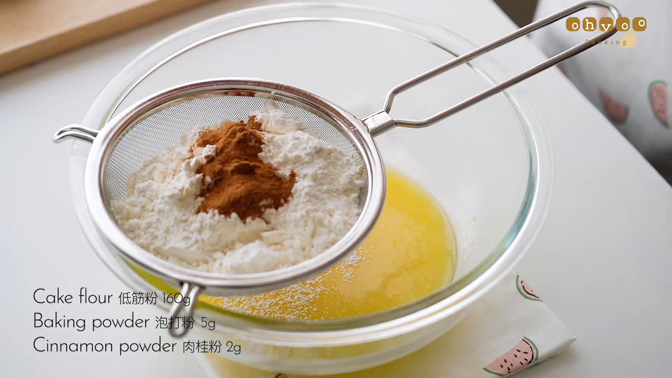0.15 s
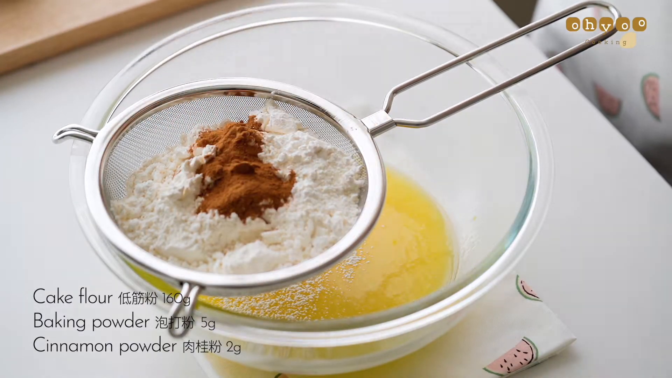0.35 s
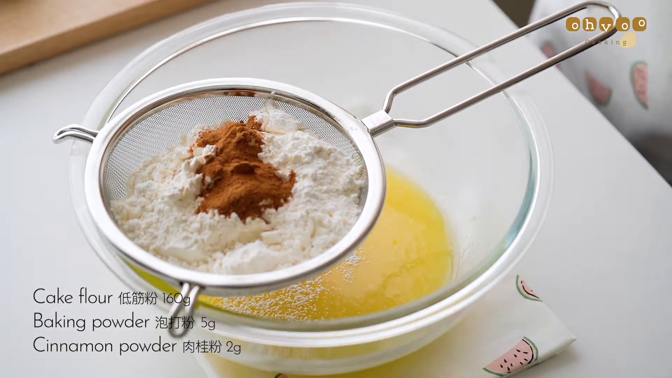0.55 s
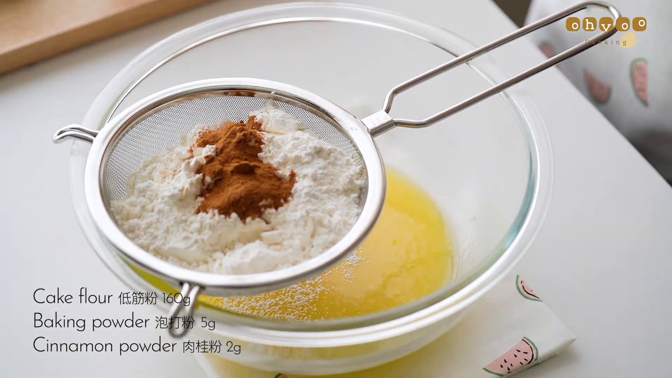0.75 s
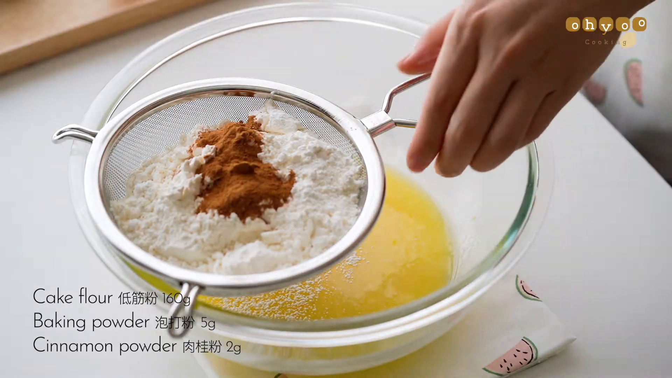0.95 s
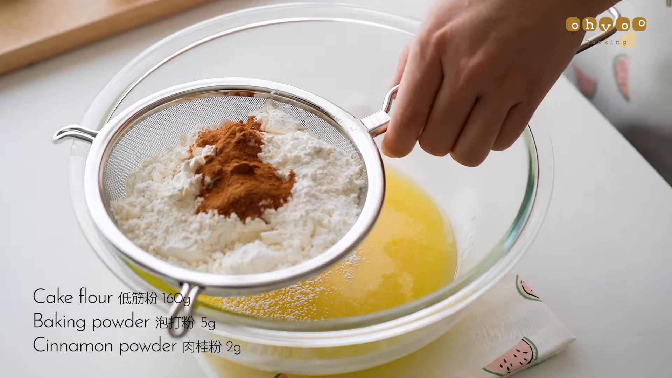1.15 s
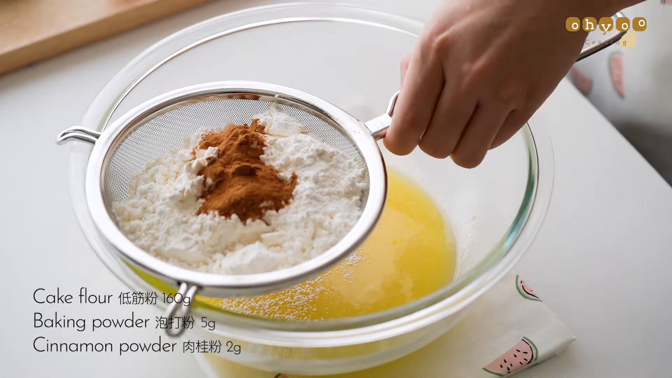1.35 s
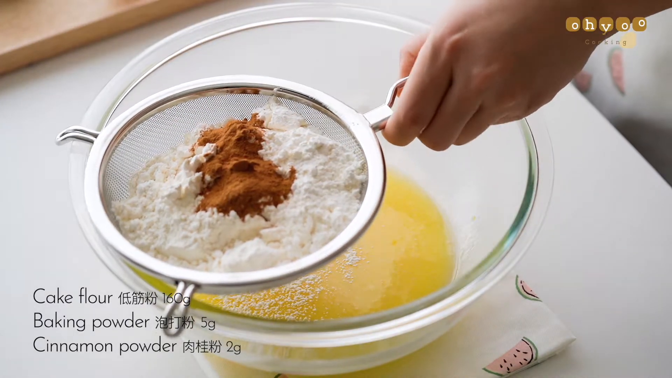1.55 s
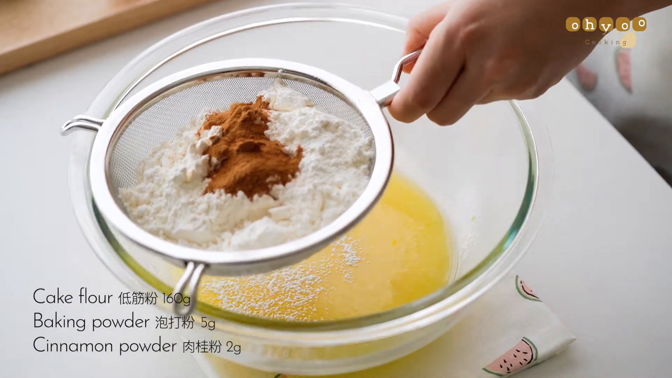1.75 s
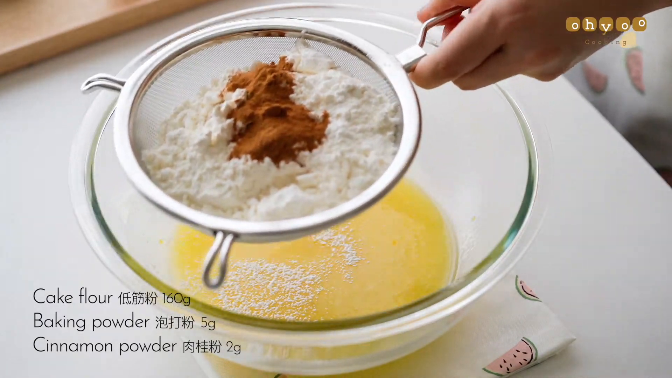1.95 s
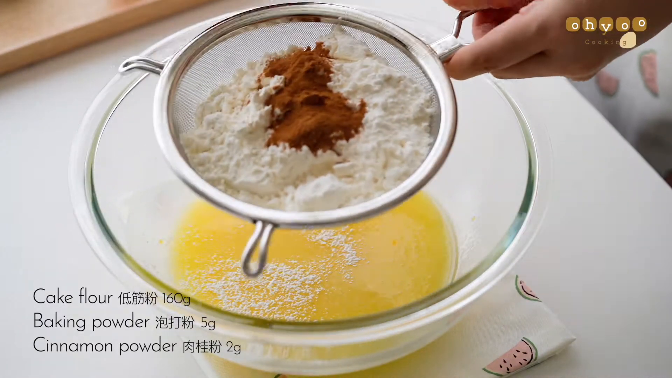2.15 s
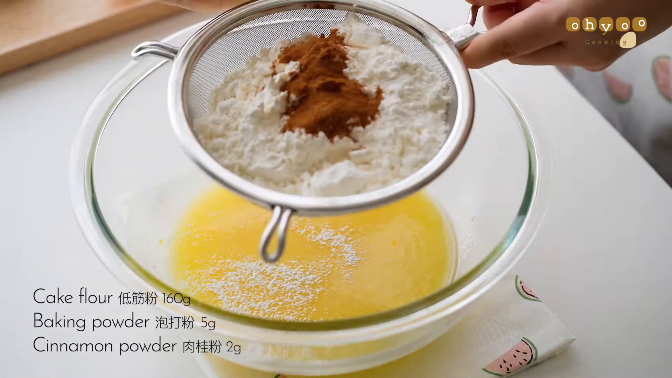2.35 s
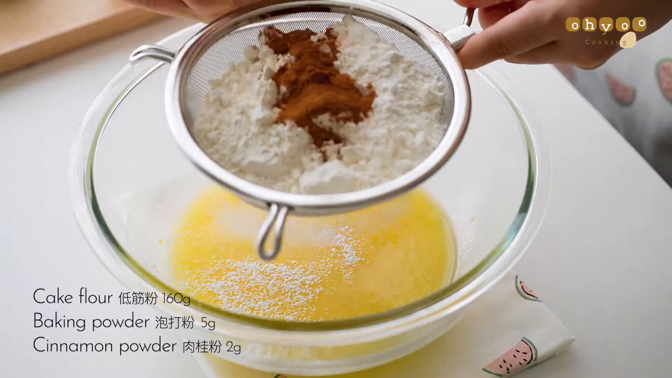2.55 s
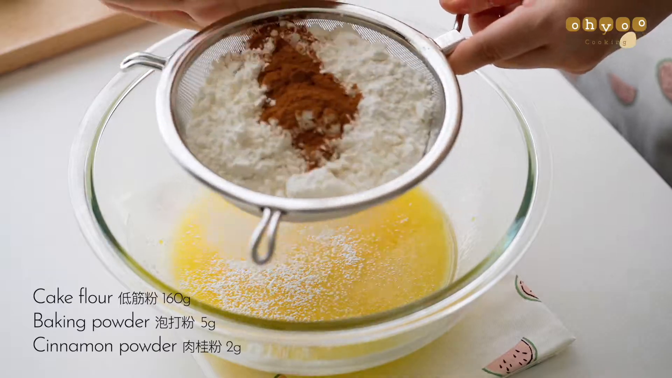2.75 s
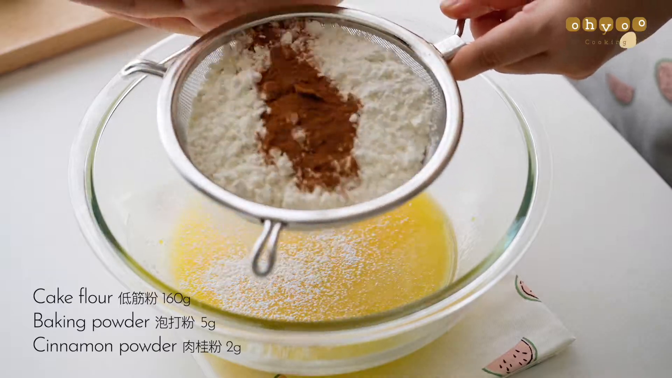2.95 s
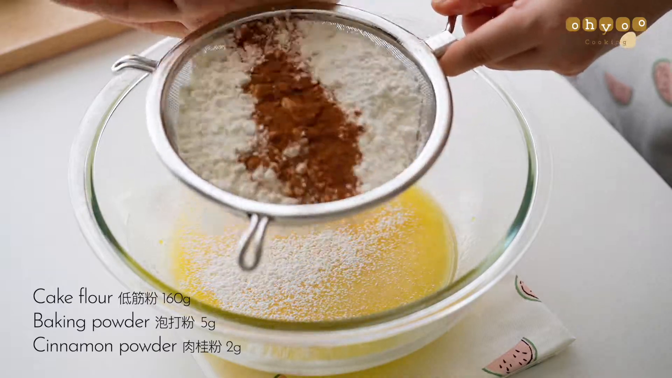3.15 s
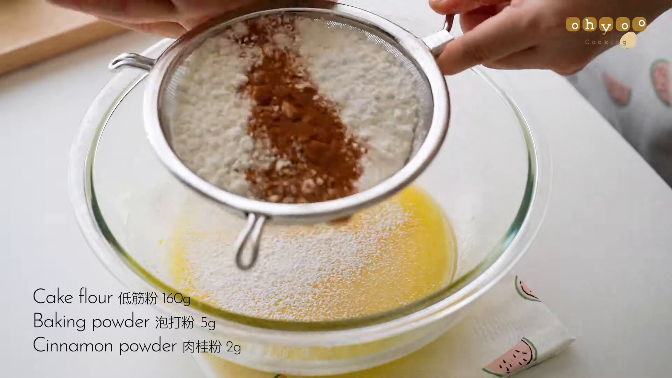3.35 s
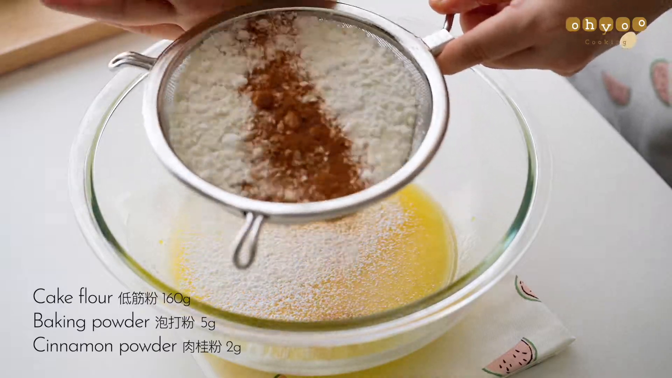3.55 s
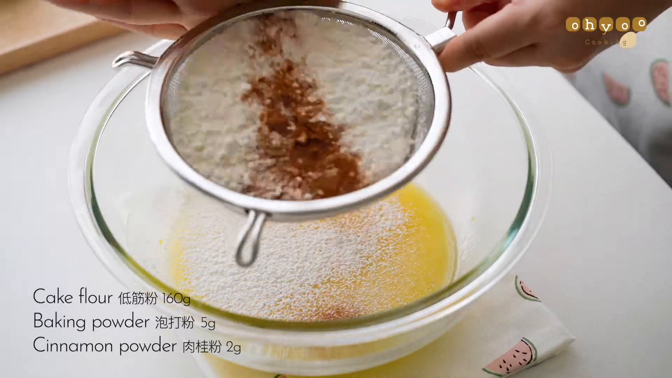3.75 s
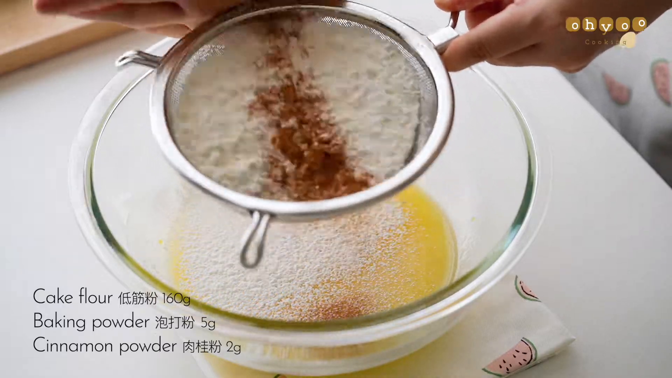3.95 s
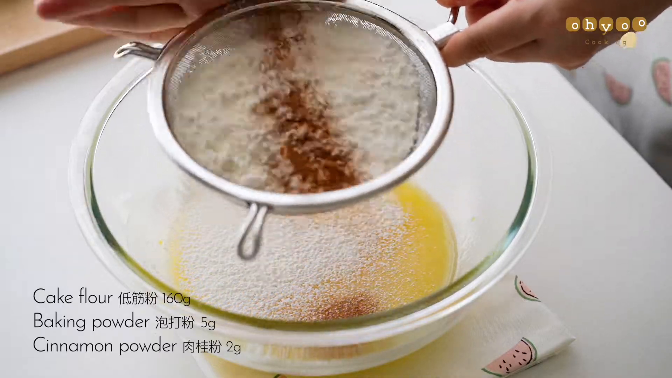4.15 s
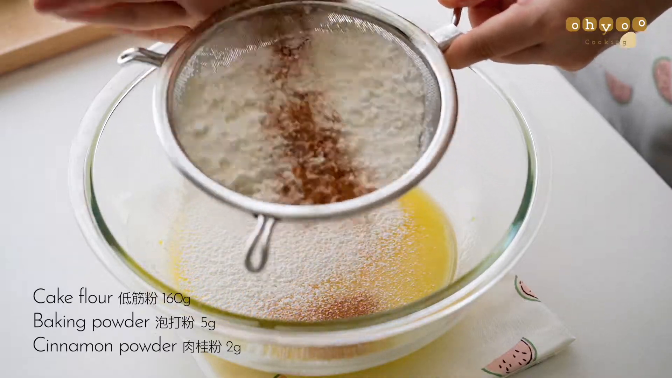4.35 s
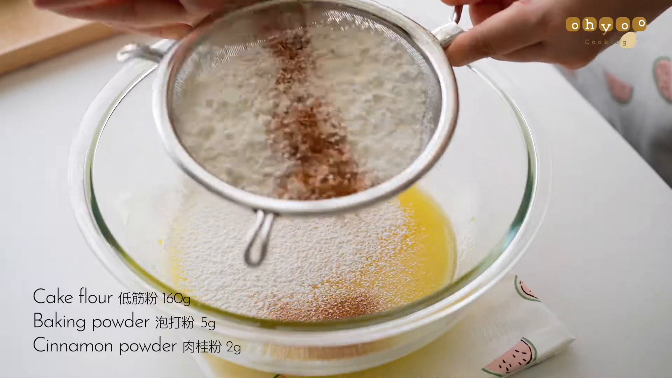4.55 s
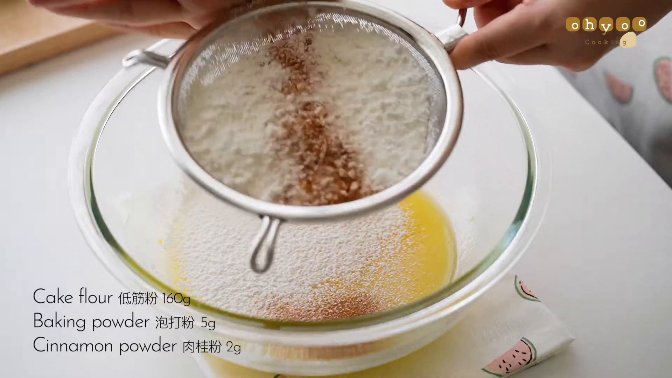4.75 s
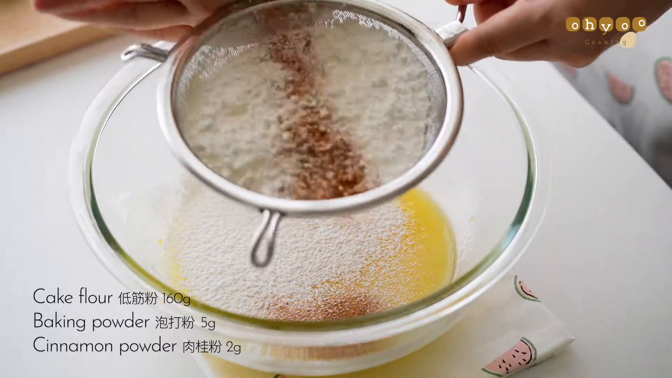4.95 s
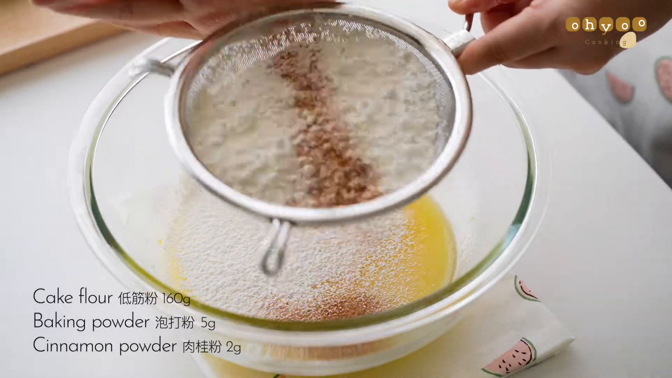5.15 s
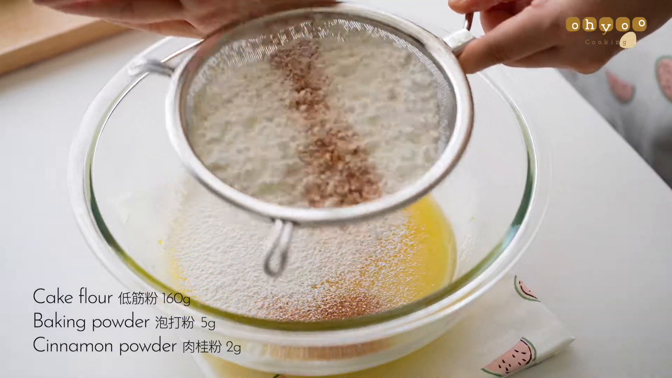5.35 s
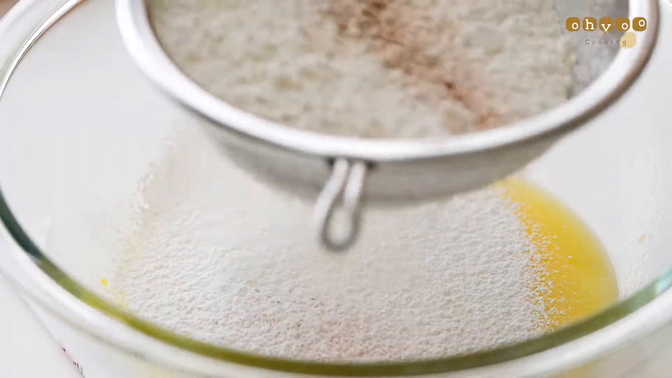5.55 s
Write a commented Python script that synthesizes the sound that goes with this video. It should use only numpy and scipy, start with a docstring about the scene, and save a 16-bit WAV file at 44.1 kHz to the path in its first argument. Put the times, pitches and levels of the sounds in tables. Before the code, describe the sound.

A metal flour sieve is picked up with a small clink off a glass bowl, then patted by hand about five times a second, flour hissing through.

```python
"""A low room rumble and finger rustle; a clinking sieve leaves a glass bowl, then pats come about five a second.
Each pat is a slap of skin on the metal rim (noise burst, damped modes), a deep bounce of the loaded mesh (pushed
swing) and a short rush of flour through the wires (filtered grit). Brushes are gritty puffs; clinks ring steel
modes. Rumble, drone and air hiss are shaped noise; bumps make the table hum at 50 Hz."""
import sys
import numpy as np
from scipy import signal
from scipy.fft import rfft, irfft, next_fast_len
from scipy.io import wavfile
from scipy.ndimage import uniform_filter1d

SR = 44100
rng = np.random.default_rng(int(sys.argv[2]) if len(sys.argv) > 2 else 0)


def voltage_ratio(decibels):
    """Convert decibels (scalar or array-like) to amplitude ratios, 20 dB per decade."""
    exponent = np.asarray(decibels, float) / 20
    return 10 ** exponent


def unload_wav(signal):
    """Save mono or channel-first audio to the path in sys.argv[1] as 16-bit WAV at rate SR, clipped to [-1, 1]."""
    wavfile.write(
        sys.argv[1],
        SR,
        np.round(np.clip(np.atleast_2d(signal).T, -1, 1) * 32767).astype(np.int16),
    )


N = 246959
T = np.arange(N) / SR
CUT_S = 5.3962  # sounds placed by add() before this stop dead here

# steel frame ring modes [f/Hz, level/dB, t60/s]
FRAME_MODES = [(690, -8, .1), (1346, -4, .2), (1403, -11, .12), (2485, -3, .15), (2515, -10, .25),
               (2600, -11, .12), (2902, -14, .15), (3905, -11, .14), (3945, 0, .075), (4387, -10, .03),
               (5532, -5, .11), (9170, -14, .08)]


def level(x, db):
    """Scale to an rms level."""
    return x * voltage_ratio(db) / np.sqrt(np.mean(x ** 2))


def unit_energy(x):
    """Scale an impulse response to unit energy: white noise keeps its rms."""
    return x / np.sqrt(np.sum(x ** 2))


def band(x, hz, width_hz):
    """Two-pole resonance, gain 1 at the centre."""
    return signal.lfilter(*signal.iirpeak(hz, hz / width_hz, fs=SR), x)


def colour(x, peaks):
    """Sound through a set of steep resonances; white noise of rms 1 comes out at rms 1."""
    probe = np.zeros(4096)
    probe[0] = 1
    shape = sum(voltage_ratio(db) * band(band(probe, hz, w), hz, 2 * w) for hz, w, db in peaks)
    return signal.fftconvolve(x, unit_energy(shape))[:len(x)]


def ring(modes, t):
    """Free decay of a set of modes."""
    out = 0
    for hz, db, t60_s in modes:
        decay = np.exp(-np.log(1000) * t / t60_s)
        out = out + voltage_ratio(db) * decay * np.sin(2 * np.pi * hz * t)
    return out


def walk(rate_hz):
    """Random levels held 1 / rate_hz and slewed twice; spread near 1."""
    k = int(SR / rate_hz)
    held = np.repeat(rng.standard_normal(N // k + 1), k)
    return 1.33 * uniform_filter1d(uniform_filter1d(held, k), k)[:N]


def grit(spread_db):
    """Noise of grains whose sizes differ widely; rms 1."""
    return level(rng.standard_normal(N) * voltage_ratio(spread_db * rng.exponential(size=N)), 0)


def add(out, s, x):
    """Mix x in from time s; a sound begun before the cut ends there."""
    i = int(s * SR)
    end = int(CUT_S * SR) if s < CUT_S - .006 else N
    x = x[:end - i]
    out[i:i + len(x)] += x


def curves(table):
    """Columns of a table, sample by sample."""
    s, *columns = np.transpose(table)
    return [np.interp(T, s, c) for c in columns]


def resonant_noise(hz, width_hz):
    """White noise through a steep resonance; rms 1."""
    noise = rng.standard_normal(N)
    return level(band(band(noise, hz, width_hz), hz, 3 * width_hz), 0)


def room():
    """Low resonances of the kitchen flutter, together and each alone, over a deeper drone."""
    # low room sound [t/s, rumble level/dB, drone level/dB]
    lows = [(0.0, -56, -59), (0.3, -57, -60), (0.45, -54, -60), (0.58, -53, -59.5), (0.63, -58.5, -59),
            (0.75, -53.5, -60.5), (1.03, -60, -61), (1.4, -55, -57), (1.89, -58, -61.5),
            (2.21, -60.5, -56.5), (2.68, -59, -61), (3.05, -58.5, -56), (3.57, -55.5, -64),
            (3.9, -59, -56.5), (4.9, -56.5, -64.5), (5.6, -58, -55.5)]
    # rumble resonances [f/Hz, width/Hz, level/dB]
    rumble_peaks = [(140, 40, -4), (172, 24, -1), (224, 24, 0), (260, 22, -5), (325, 45, -7),
                    (420, 100, -15), (600, 300, -23)]
    # drone resonances [f/Hz, width/Hz, level/dB]
    drone_peaks = [(32.3, 5.7, -11.5), (50.6, 45, -1), (79.1, 14.2, 0)]
    rumble_db, drone_db = curves(lows)
    flutter = walk(7.1)
    rumble, drone = np.zeros(N), np.zeros(N)
    for hz, w, db in rumble_peaks:
        rumble += voltage_ratio(db + 1.84 * flutter + 2.53 * walk(12)) * resonant_noise(hz, w)
    for hz, w, db in drone_peaks:
        drone += voltage_ratio(db + 1.1 * walk(7.9)) * resonant_noise(hz, w)
    return voltage_ratio(rumble_db) * level(rumble, 0) + voltage_ratio(drone_db) * level(drone, 0)


def air():
    """Thin steady hiss: white noise shaped in frequency."""
    # hiss spectrum before scaling [f/Hz, level/dB]
    spectrum = [(240, -3), (400, 3.5), (496, -8), (579, 3.5), (906, -17), (2120, -13.5), (4650, -24),
                (8750, -36), (11000, -46), (15000, -44), (16000, -46)]
    hz, db = np.transpose(spectrum)
    size = next_fast_len(N)
    bin_hz = np.arange(size // 2 + 1) * SR / size
    gain = voltage_ratio(np.interp(np.log(bin_hz + 1), np.log(hz), db))
    return level(irfft(rfft(rng.standard_normal(size)) * gain, size)[:N], -74)


def hands():
    """Fingers and stray flour rustle in uneven patches; the rubbing keeps the frame faintly singing."""
    # hands moving [t/s, rustle level/dB]
    rustle_levels = [(0.0, -78), (0.8, -77), (0.97, -73.5), (1.26, -76), (1.46, -68.5), (1.56, -67),
                     (1.73, -75.5), (2.14, -72.5), (2.3, -77), (2.9, -73.5), (3.81, -74), (4.5, -75),
                     (5.21, -73), (5.6, -69.5)]
    # rustle colour [f/Hz, width/Hz, level/dB]
    rustle_peaks = [(1415, 1760, 4.5), (2500, 170, -11), (3900, 530, -41), (5470, 910, -10)]
    # fine treble colour [f/Hz, width/Hz, level/dB]
    fine_peaks = [(6800, 4500, -2.5), (8270, 2250, -3.5)]
    # fingers close on the bare handle while the frame still rests on the glass
    grip_start_s, grip_end_s = 1.12, 1.68
    free_sing_db, held_sing_db = -12, -19  # under the rustle, in that span and outside it
    rustle_db, = curves(rustle_levels)
    # treble levels at a -76 dB rustle, and how far they follow it
    fine_db = -80 + 0.42 * (rustle_db + 76)
    top_db = -86.5 + 0.33 * (rustle_db + 76)
    rub = grit(1.94) * voltage_ratio(rustle_db + 1.35 * walk(40))
    gripping = (T > grip_start_s) & (T < grip_end_s)
    sing_db = np.where(gripping, free_sing_db, held_sing_db) + 4 * walk(25)
    frame = ring(FRAME_MODES, T[:SR // 4])
    sing = signal.fftconvolve(rub * voltage_ratio(sing_db), unit_energy(frame))[:N]
    fine = colour(grit(1.0) * voltage_ratio(fine_db + 1.3 * walk(40)), fine_peaks)
    top = colour(grit(0.55) * voltage_ratio(top_db), [(14000, 2800, 0)])
    return colour(rub, rustle_peaks) + sing + fine + top


def swishes():
    """Short brushes of skin, cloth and wire, each a gritty puff in its own band."""
    # brushes, low against the table, high on handle and cloth [t/s, level/dB, f/Hz, spread/ms]
    brushes = [(.058, -75, 9300, 20), (.055, -80, 12800, 16), (.06, -73, 1150, 12), (.205, -76, 9400, 6),
               (.247, -66.5, 1200, 6), (0.466, -46, 224, 16.7), (.48, -77, 3960, 19.6),
               (.536, -50, 244, 33), (0.581, -51, 232, 7.3), (.83, -76.5, 9300, 15), (0.945, -53, 275, 18),
               (1.0, -68, 2200, 16), (1.0, -77, 7800, 19), (1.19, -76, 5900, 14), (1.185, -77, 13500, 17),
               (1.01, -80, 14000, 25), (1.236, -65.5, 9100, 4.7), (1.4, -72.5, 14000, 53),
               (1.55, -78, 14000, 50), (1.62, -73, 8800, 20), (1.72, -75, 7000, 32), (1.825, -75, 6800, 10),
               (1.99, -74, 7500, 15), (2.15, -76, 14000, 18), (2.17, -77, 6800, 40)]
    out, t, noise = np.zeros(N), T[:SR // 5], grit(2.9)
    for s, swish_db, hz, spread_ms in brushes:
        start = int(s * SR)
        puff = np.exp(-((t - .1) / (spread_ms / 1000)) ** 2) * noise[start:start + len(t)]
        swish = voltage_ratio(swish_db) * colour(puff, [(hz, 0.19 * hz, 0)])
        before_start = max(int((.1 - s) * SR), 0)
        add(out, max(s - .1, 0), swish[before_start:])
    return out


def knocks():
    """Skin lands on the rim: a bright slap and a dull knock, each spot stirring the modes differently."""
    # skin and rim in contact [t/s, slap level/dB, knock level/dB, slap centre f/Hz]
    contacts = [(0.7773, -58, -55, 2280), (0.852, -68, -53, 1850), (0.9257, -53.5, -48.5, 2430),
                (0.9955, -73, -48.5, 2040), (1.255, -69, -56, 2670), (1.3467, -60, -43, 2200),
                (1.3716, -56.5, -62, 3200), (1.487, -44.5, -29.5, 2120), (1.5169, -60, -45, 2530),
                (1.5651, -57, -40.5, 3000), (2.467, -53, -46, 5800), (2.672, -47, -54, 3900),
                (2.7397, -68, -60, 1830), (2.8917, -51, -44, 3800), (2.9496, -60, -54, 6240),
                (3.0936, -46, -49, 3150), (3.3074, -47.5, -50.5, 3530), (3.5144, -52, -45.5, 3890),
                (3.5967, -72, -51.5, 1840), (3.7307, -47, -39.5, 3800), (3.901, -52.5, -39, 1820),
                (3.9459, -46, -40.5, 3190), (3.9866, -53, -50.5, 2710), (4.1255, -56, -44, 1810),
                (4.1622, -46.5, -41.5, 3860), (4.2023, -56, -49, 2520), (4.2294, -69, -49.5, 2380),
                (4.3376, -52.5, -51.5, 3330), (4.3486, -51.5, -46, 2200), (4.369, -50, -56, 3790),
                (4.5146, -60, -52.5, 3720), (4.5758, -44.5, -35, 3800), (4.6054, -56, -61, 2510),
                (4.7618, -56, -48.5, 3650), (4.8233, -60, -62, 2430), (4.9369, -59, -49.5, 2380),
                (4.9671, -55, -44, 3630), (5.015, -56, -60.5, 6370), (5.1362, -44, -42, 3700),
                (5.1808, -54.5, -46, 3630), (5.3414, -52.5, -46, 1830), (5.3853, -54, -44, 3380),
                (5.3946, -49, -47.5, 2520), (5.425, -55, -49, 3540), (5.4365, -52, -55, 3800)]
    # slap colour before tilting about its centre [f/Hz, width/Hz, level/dB]
    slap_peaks = [(2500, 1620, 19.5), (3800, 2150, 17), (5600, 1070, 13.5), (10000, 11000, 2.5),
                  (13000, 8600, -16)]
    # hand-damped rim, before each spot's shift [f/Hz, level/dB, t60/s]
    rim_modes = [(323, -6, 0.019), (497, -2.5, 0.021), (685, 0, 0.023), (940, -2, 0.015),
                 (1212, -3.5, 0.013)]
    out, t = np.zeros(N), T[:SR // 10]
    spots = rng.standard_normal((len(contacts), len(rim_modes)))
    noise = grit(2.5)
    for (s, slap_db, knock_db, centre_hz), spot in zip(contacts, spots):
        contact_ms = max(2.65 + 0.22 * (knock_db - slap_db), .5)  # fleshier contacts last longer
        envelope = np.minimum(t / 0.00031, 1) * np.exp(-(t / (contact_ms / 1000)) ** 2)
        burst = envelope * np.resize(noise[int(s * SR):], len(t))
        # 9.9 dB down per octave from the centre
        peaks = [(f, w, db - 9.9 * abs(np.log2(f / centre_hz))) for f, w, db in slap_peaks]
        slap = colour(burst, peaks)
        modes = [(f * (1 + .035 * c), db + 4 * c, t60_s) for (f, db, t60_s), c in zip(rim_modes, spot)]
        knock = np.minimum(t / .001, 1) * ring(modes, t)
        add(out, s + .0006, voltage_ratio(slap_db) * slap + voltage_ratio(knock_db) * knock)
    return out


def table_hum():
    """Bumps set the table humming at its low mode."""
    # bumps [t/s, level/dB]
    bumps = [(.990, -39.5), (1.512, -45)]
    out, t = np.zeros(N), T[:SR // 2]
    for s, db in bumps:
        add(out, s, np.minimum(t / .015, 1) * ring([(50, db, .5)], t))
    return out


def clinks():
    """The steel frame touches the glass and rings; tilt sets how strongly the upper modes speak."""
    # frame against glass [t/s, ring level/dB, tilt about 4 kHz/(dB per octave)]
    touches = [(.997, -76, -8), (1.2355, -82, 14), (1.316, -73, -3), (1.373, -67, -1), (1.488, -59, -1),
               (1.498, -52, -1), (1.519, -62, 3), (1.566, -68, -4), (1.6, -72, -2)]
    out, t = np.zeros(N), T[:SR // 2]
    for s, clink_db, tilt_db in touches:
        modes = [(hz, db + tilt_db * np.log2(hz / 4000), t60_s) for hz, db, t60_s in FRAME_MODES]
        add(out, s, voltage_ratio(clink_db) * ring(modes, t))
    return out


def flour_rush(slide):
    """Flour sliding through the mesh: gritty noise in mesh colours plus narrow tones of the taut wires."""
    # mesh colour [f/Hz, width/Hz, level/dB]
    mesh_peaks = [(359, 230, 8), (628, 626, 8.5), (1078, 83, 2), (1800, 400, -28), (2656, 1370, 4),
                  (3494, 870, 8), (5240, 1050, 6), (5970, 1300, 2), (7100, 630, -22), (13500, 5900, -13.5)]
    # wire tones, before wandering [f/Hz, width/Hz, level/dB]
    wire_tones = [(1230, 100, -1), (2730, 160, -7), (3190, 200, -4), (3800, 150, 0), (4790, 110, -7),
                  (5340, 250, -6), (6050, 180, -6), (6400, 150, -3)]
    flour = slide * voltage_ratio(2.0 * walk(300)) * grit(1.8)
    tones = np.zeros(N)
    for hz, w, db in wire_tones:
        tones += voltage_ratio(db + 4 * walk(5)) * colour(flour, [(hz, w, 0)])  # each pat favours other wires
    return colour(flour, mesh_peaks) + voltage_ratio(-16) * tones


def bounces():
    """The palm pushes the rim for a few ms; the loaded mesh swings against the frame while flour slides through."""
    # bounces of the loaded mesh [crest t/s, thud level/dB, flour level/dB, flour spread/ms]
    pats = [(1.5006, -41, -62, 9), (2.4765, -35, -63.5, 11), (2.6791, -31, -54.5, 15.5),
            (2.9, -28.5, -49.5, 11), (3.1022, -29.5, -50.5, 13.5), (3.316, -28.5, -51.5, 14),
            (3.523, -30.5, -53, 14), (3.7384, -30, -49, 13.4), (3.9568, -34.5, -54.5, 17),
            (4.1707, -31.5, -52.5, 10.5), (4.3752, -32, -49.5, 13.4), (4.5816, -30.5, -53, 10.6),
            (4.7808, -38.5, -53.5, 19), (4.9764, -34.5, -53.5, 11.5), (5.1915, -36, -49.5, 9.1),
            (5.3943, -32, -49, 11), (5.4379, -35.5, -43, 8.8), (5.578, -52, -54.5, 32)]
    # frame moving against the mesh [f/Hz, level/dB, t60/s]
    recoil_modes = [(54, .85, .0285), (135, -33, .1), (22, -16.3, .2)]
    contact_s, lead_s, flour_lead_s = .0066, .0072, .03
    flour_lag_s = .0075  # flour peaks this long after the crest
    thud, slide, t = np.zeros(N), np.zeros(N), T[:SR // 5]
    jolt = np.gradient(np.sin(np.pi * np.minimum(t / contact_s, 1)) ** 2)
    for s, thud_db, flour_db, spread_ms, c in np.c_[pats, rng.standard_normal(len(pats))]:
        swing_hz = 35.5 - .12 * np.clip(thud_db + 31, -8, 8)  # harder pats swing slower
        swing = ring([(swing_hz, 0, .065)], t) - ring(recoil_modes, t)
        swing = swing - ring([(170 + 15 * c, -34 + 3 * c, .05)], t)
        wave = signal.fftconvolve(jolt, swing)[:len(t)]
        # the lifted flour lands again and pushes the mesh once more
        landing_s = lead_s + .023 * (1 + .06 * c)
        rebound = voltage_ratio(-23) * np.exp(-((t - landing_s) / (contact_s / 2)) ** 2)
        add(thud, s - lead_s, voltage_ratio(thud_db) * (wave / wave.max() + rebound))
        late = t - flour_lead_s - flour_lag_s
        trickle = 0.042 * (late > 0) * np.exp(-np.abs(late) / 0.02)
        rush = np.exp(-(late / (spread_ms / 1000)) ** 2) + trickle
        add(slide, s - flour_lead_s, voltage_ratio(flour_db) * rush * np.minimum(t / 0.005, 1))
    return thud + flour_rush(slide)


def kitchen_tail(near):
    """Reflections of the close sounds: a short, dull decaying noise tail."""
    t = T[:SR // 3]
    tail = band(rng.standard_normal(len(t)), 790, 2700) * np.exp(-np.log(1000) * t / 0.11) * (t > .004)
    return voltage_ratio(-16.5) * signal.fftconvolve(near, unit_energy(tail))[:N]


def scene():
    """Knocks, clinks and bounces get the kitchen tail; the rest is mixed dry."""
    near = knocks() + clinks() + bounces()
    near = near + kitchen_tail(near)
    return (near + hands() + swishes() + room() + table_hum() + air())[None]


def roll_off(x):
    """The treble ends steeply here."""
    return signal.sosfilt(signal.butter(12, 16130, fs=SR, output="sos"), x)


def record(dry):
    """Add a small steady offset to the mix."""
    mix = dry + 0.00043
    return roll_off(mix)


dry = scene()
out = record(dry)
unload_wav(out)
```